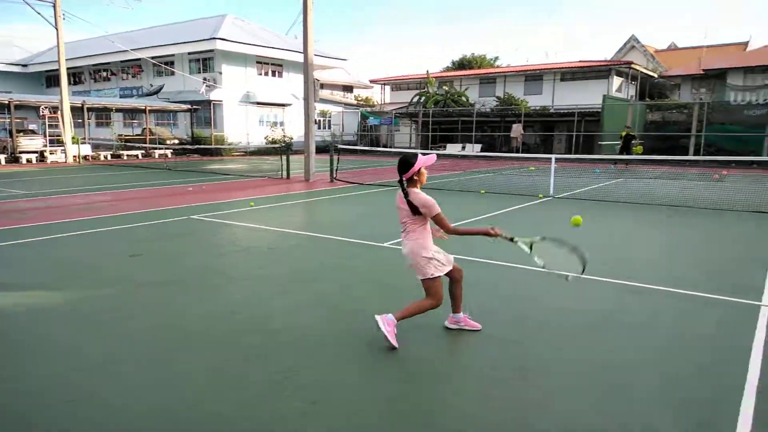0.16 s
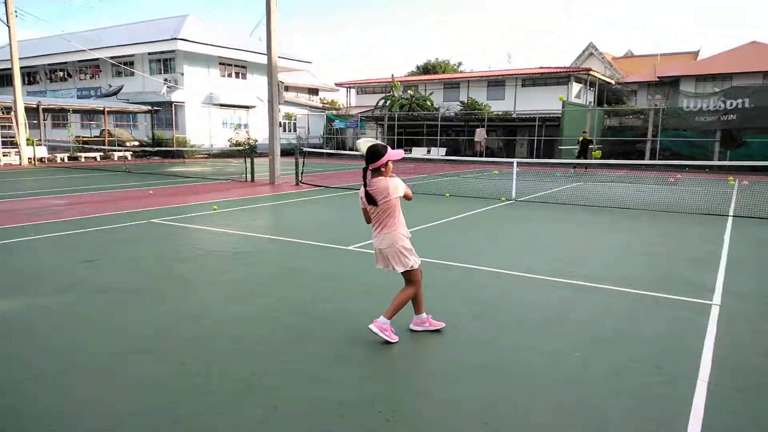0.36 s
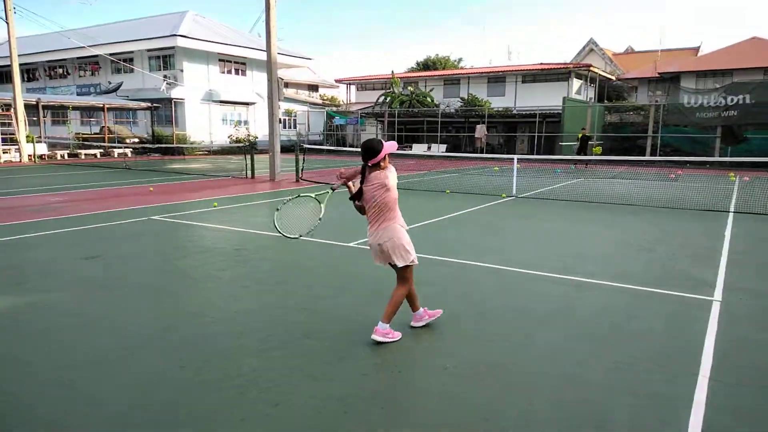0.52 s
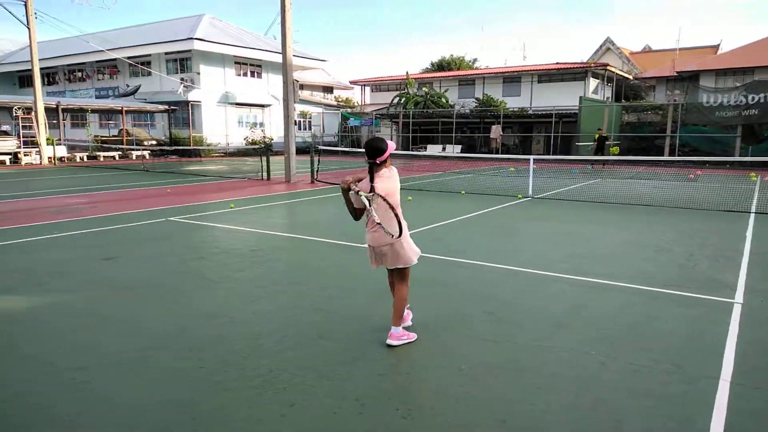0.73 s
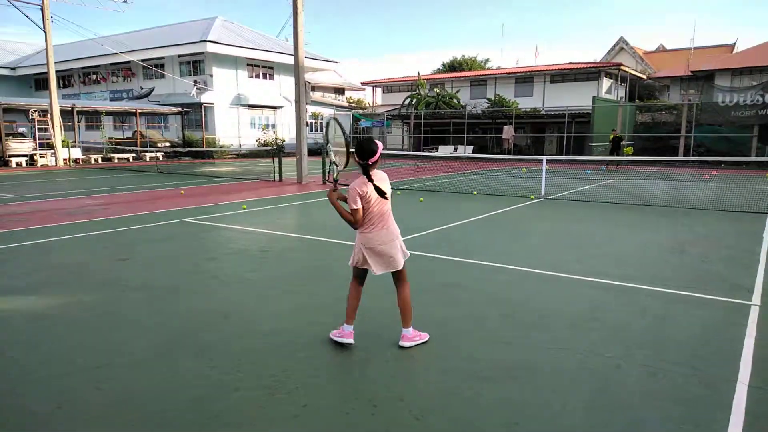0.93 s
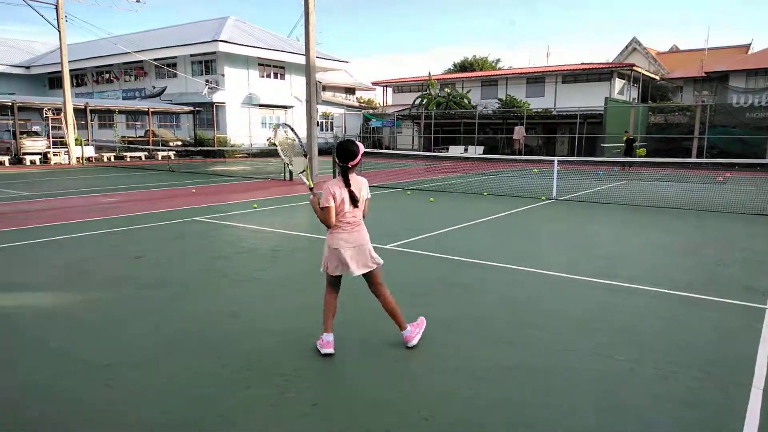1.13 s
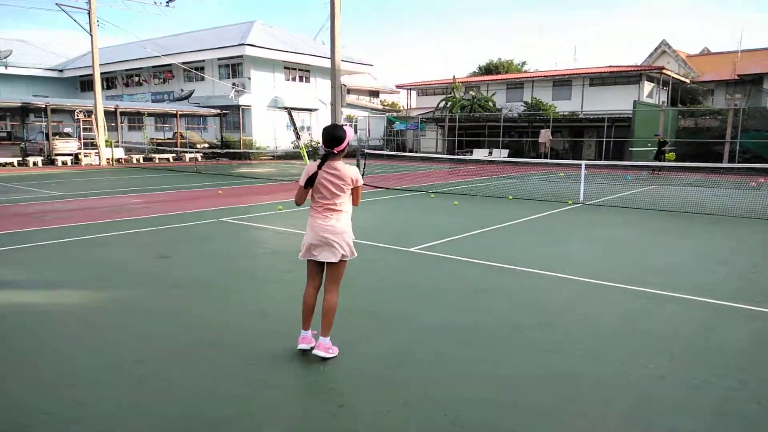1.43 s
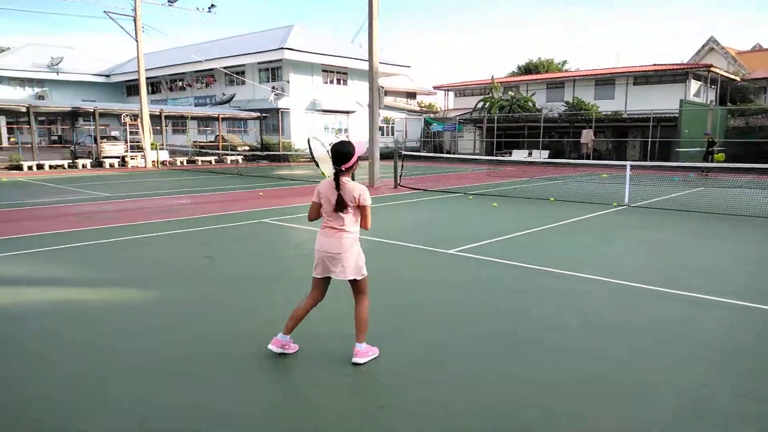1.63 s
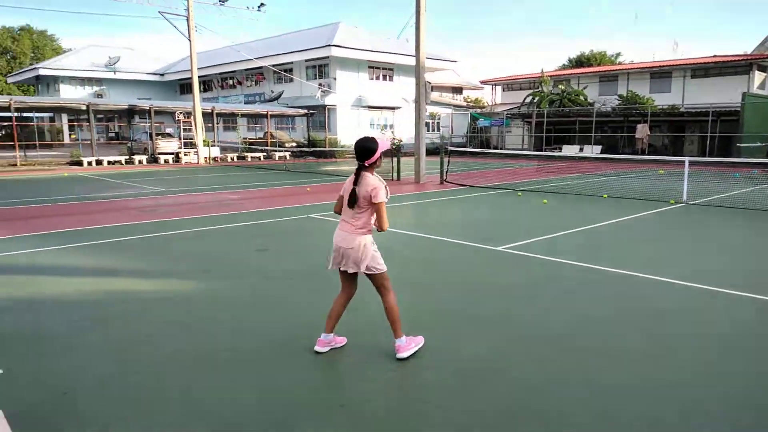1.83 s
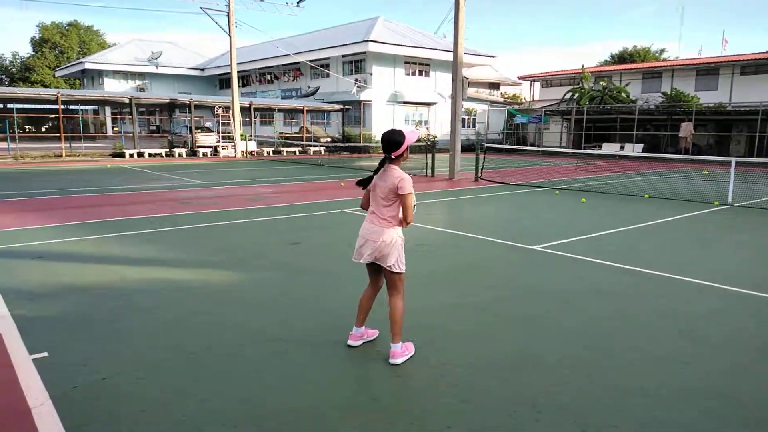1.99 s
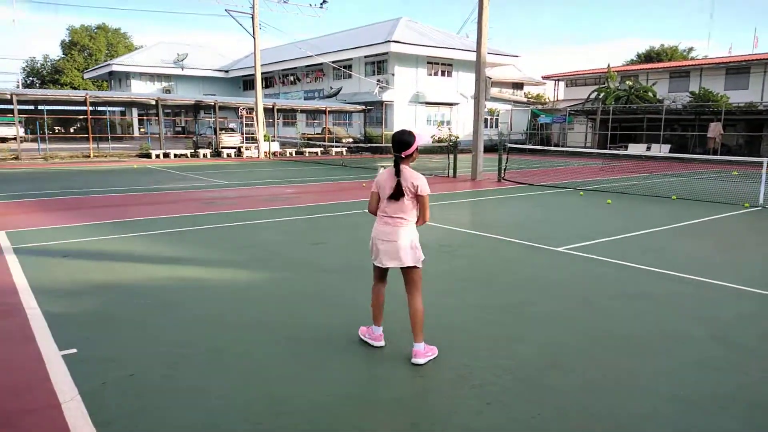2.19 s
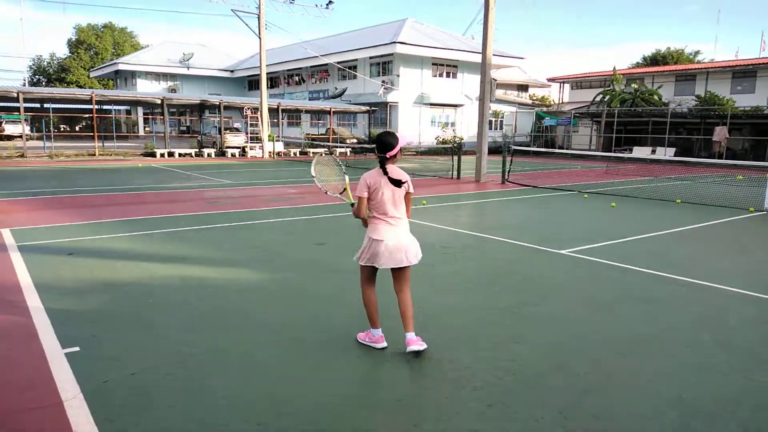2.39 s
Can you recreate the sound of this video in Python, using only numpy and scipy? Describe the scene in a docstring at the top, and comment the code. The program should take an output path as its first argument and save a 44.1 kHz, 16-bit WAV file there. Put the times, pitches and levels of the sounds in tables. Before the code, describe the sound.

Faint gritty shoe scuffs open on an outdoor hard court. At about 0.24 s a racket strikes a tennis ball: a sharp, springy pop with short echoes and a fading wash. Small birds chirp faintly near 0.6, 0.9 and 2.3-2.5 s. A hollow ball knock lands at 1.6 s, with much fainter ones at 1.4, 2.0, 2.1 and 2.3 s. Light steps scuff over quiet distant traffic rumble and low hum.

```python
"""A racket strikes a tennis ball outdoors on a hard court: tuned strings and frame, plus shaped noise.
Buildings and fences return it as separate echoes, clusters of ringing and a fading wash of noise.
Other balls pock later, each a pair of climbing tones over a thud and a crack.
Shoes scuff the court (gritty noise), small birds chirp (blurred gliding tones),
far traffic rumbles (shaped noise) and far machinery hums (a wavering tone)."""
import sys
import numpy as np
from scipy import signal
from scipy.fft import rfft, irfft
from scipy.io import wavfile
from scipy.ndimage import uniform_filter1d

SR = 44100
rng = np.random.default_rng(int(sys.argv[2]) if len(sys.argv) > 2 else 0)


def wrap_up_sound(samples):
    """Save the sound to the file named by the first command line argument, as 16-bit audio."""
    columns = np.atleast_2d(samples).T
    # keep every value between -1 and 1, then stretch to whole-number steps
    tamed = np.clip(columns, -1, 1)
    steps = np.round(tamed * 32767).astype(np.int16)
    wavfile.write(sys.argv[1], SR, steps)


N = 112454  # length in samples

# Colour of the open air and far traffic: pitch_hz, level_db (per Hz)
AIR_COLOUR = [(12, -35), (25, -8.5), (33, -5), (41, -1), (52, 0.5), (65, -6), (107, -7.5), (177, -6.5),
              (248, -19), (328, -17.5), (485, -21), (873, -22), (1440, -26), (1910, -30), (5230, -39),
              (6600, -35.5), (9140, -41), (14000, -38.5), (15600, -37.5), (16000, -32)]
# Shoe scuffs: peak_s, rise_s, fall_s, level_db, tilt_db (per octave)
SCUFFS = [(0.013, 0.042, 0.063, -55, 13.5), (0.052, 0.04, 0.013, -58.5, -2.5), (.115, 0.04, 0.057, -61, -3),
          (0.189, 0.23, 0.11, -64, 9.5), (.45, 0.04, 0.011, -66.5, -1), (0.6, 0.16, 0.063, -68, -4),
          (1.087, 0.037, 0.01, -60, 1.5), (1.119, 0.023, 0.027, -69.5, 1.5),
          (1.219, 0.012, .005, -54.5, 17.5), (1.34, 0.022, 0.023, -72, 0), (1.455, 0.018, 0.013, -65, 3.5),
          (1.57, 0.017, 0.027, -70, 9), (1.65, 0.013, 0.01, -66.5, 4), (1.695, 0.026, 0.012, -64, 0.5),
          (1.89, 0.018, 0.013, -71, 29), (2.023, 0.022, 0.01, -61.5, 0.5),
          (2.488, 0.019, 0.0043, -63, -6.5)]
# Colour of grit under a sole: pitch_hz, level_db (per Hz)
GRIT_COLOUR = [(470, -11), (800, -6.5), (1800, -5), (4860, -12), (6200, -9), (6900, -3), (7700, -13.5),
               (9220, -20), (13000, -25.5), (15500, -12), (16000, -18)]
# Frame and ball tones, beside the strings: pitch_hz, level_db, delay_s, t60_s (time to fall 60 dB)
FRAME_MODES = [(183, -1.5, 0.0024, 0.026), (503, -1, 0.0034, 0.0077), (1005, -16.5, 0.00077, 0.072),
               (1274, -17.5, 0.00045, 0.06), (1600, -11, 0.0045, 0.027), (1740, -9.5, .004, 0.029),
               (2264, -24.5, 0.00109, 0.12), (2714, -17.5, 0.00197, 0.03), (3170, -21, 0.00176, 0.056)]
# Colour of the racket's crack: pitch_hz, level_db (per Hz)
STRIKE_CRACK_COLOUR = [(880, 1.5), (1400, -10.5), (1750, -9), (2100, -8.5), (3500, -11.5), (5600, -14.5),
                       (6500, -10.5), (7000, -4), (7700, -10), (9750, -23), (12400, -20.5), (15500, -24),
                       (16000, -13.5)]
# Echoes of the whole strike: delay_s, level_db
STRIKE_ECHOES = [(.0186, -17), (.05, -29), (.062, -31), (.224, -30)]
# Returns of the struck ball's ring: delay_s, level_db (before the cluster trim in rings)
STRIKE_RING_ECHOES = [(.024, -20), (.04, -24), (.056, -25), (.075, -25), (.095, -28), (.12, -30),
                      (.145, -31), (.18, -33), (.2245, -27), (.262, -30), (.285, -30), (.31, -31),
                      (.335, -32), (.365, -34)]
# Colour of the long tail at its start: pitch_hz, level_db (per Hz)
YARD_COLOUR = [(100, -8), (200, -1), (350, -7.5), (700, -6.5), (830, -2), (900, -6.5), (980, -9),
               (1150, -13), (2000, -19), (4500, -28), (6900, -17), (9500, -37.5), (15500, -23.5)]
# How long the tail lasts at each pitch: pitch_hz, t60_s
YARD_T60 = [(200, 1.83), (900, 1.44), (2500, 1.21), (7000, 0.69), (15000, 0.91)]
# Bird chirps: start_s, length_s, level_db, from_hz, to_hz, width_hz (of each blur filter)
CHIRPS = [(0.547, 0.14, -71.5, 4020, 3680, 999), (0.577, 0.056, -69.5, 3220, 3040, 250),
          (.931, .028, -72, 7200, 6500, 600), (.912, .018, -76, 6000, 5300, 300),
          (.938, .036, -73.5, 6050, 5050, 500), (.955, .075, -74.5, 5700, 5300, 1000),
          (2.282, 0.066, -73, 6100, 6450, 250), (2.342, 0.18, -81.5, 6480, 6350, 150),
          (2.463, 0.038, -77, 4360, 5300, 150), (2.494, 0.0242, -67, 5250, 6600, 100),
          (2.504, 0.035, -73, 6400, 6460, 120)]
# Other balls: start_s, level_db, pitch_hz, upper_ratio, climb_s, swell_s, t60_s,
# thud_db, crack_db (both beside the ring), echo_db, tail_db, early_db (beside the tail)
POCKS = [(1.3941, -46, 1190, 1.51, 0.00097, 0.003, 0.013, -8, -14, -13, -74, 3),
         (1.6051, -28, 965, 1.215, 0.00305, 0.0043, 0.018, -12, -12, -5.5, -55.5, -18),
         (2.015, -48, 702, 1.39, 0.00097, 0.0032, 0.017, -8.5, -16, -17, -80.5, 13),
         (2.073, -54, 744, 1.23, 0.0018, 0.0028, 0.022, -11, -7.5, -24, -96, -4),
         (2.288, -54, 620, 1.36, 0.00087, 0.0014, 0.017, -28, -12, -24, -88, 3)]
# Colour of the other balls' crack: pitch_hz, level_db (per Hz)
POCK_CRACK_COLOUR = [(900, 10.5), (1800, -9.5), (2800, -21.5), (4200, -8), (5300, -18), (6800, -1.5),
                     (8000, -14), (11000, -24), (15500, -17)]
# Echoes of each other whole blow: delay_s, level_db (echo_db is added)
POCK_ECHOES = [(.0115, -13), (.1, -12)]
# Returns of the other balls' ring: delay_s, level_db (echo_db and the cluster trim are added)
POCK_RING_ECHOES = [(.014, -14), (.026, -18), (.043, -9), (.054, -10), (.078, -22), (.095, -22),
                    (.112, -21), (.138, -21), (.165, -23), (.195, -23), (.215, -25), (.25, -25)]

AIR_DB = -59
HUM_HZ, HUM_DB, HUM_WAVER = 40.3, -62.5, 1.3  # waver: size beside the steady part
GRIT_DB = 1.5  # typical size of the random level swings

STRIKE_S, STRIKE_DB = .2368, -21.5
# Strings: slack is the share of pitch missing at first; sink is over one contact time
STRINGS_HZ, SLACK, TIGHTEN_S, SWELL_S, SINK_DB = 751, 0.59, 0.0038, 0.0028, -2
CONTACT_S, LEAVE_S = .0113, .0007
CRACK_DB, CRACK_RISE_S, CRACK_T60 = -8, 0.0038, .03
HIGH_HISS_HZ, HIGH_HISS_DB, HIGH_HISS_T60 = 15300, -18, 0.068

DULL_HZ_S = 350  # treble limit of an echo in Hz = this / delay in s
BALL_HZ, BALL_T60 = 888, 0.026
# Widest extra delay, and widest share of pitch change, inside a cluster of returns
STRIKE_SCATTER_S, STRIKE_DETUNE = .022, .1
POCK_SCATTER_S, POCK_DETUNE = .009, .04
YARD_DB, YARD_START_S = -50, 0.009
EARLY_DB, EARLY_T60, EARLY_TILT_DB = 8, .16, 1  # level beside the tail; tilt about per octave

POCK_SLACK, UPPER_DB = 0.74, -9.5
THUD_HZ, THUD_T60 = 201, 0.074
BODY_HZ, BODY_DB = 513, 3.5  # the flexing wall of the ball; level beside the thud


def amp(db):
    """Turn decibels into a plain multiplier."""
    return 10 ** (np.asarray(db) / 20)


def evened(x):
    """Scale a signal to an rms (average strength) of 1."""
    return x / np.sqrt(np.mean(x ** 2) + 1e-20)


def read(points, hz):
    """Read a curve between its points, along a log pitch scale."""
    f, value = np.transpose(points)
    return np.interp(np.log(hz + 1), np.log(f + 1), value)


def add(mix, s, sound):
    """Add a sound into the mix at time s, cutting what runs past the end."""
    part = mix[round(s * SR):][:len(sound)]
    part += sound[:len(part)]


def hiss(size, colour, tilt_db=0):
    """Noise of rms 1 with a given colour, tilted around 4000 Hz."""
    hz = np.fft.rfftfreq(size, 1 / SR)
    level_db = read(colour, hz) + tilt_db * np.log2((hz + 1) / 4000)
    gain = amp(level_db) * (hz > colour[0][0] / 2)  # nothing far below the first point
    return evened(irfft(rfft(rng.standard_normal(size)) * gain, size))


def burst(t, rise, t60):
    """Loudness shape of a knock: a soft rise, then an exponential decay."""
    t = np.maximum(t, 0)
    swell = np.sin(np.pi / 2 * np.minimum(t / rise, 1)) ** 2
    return swell * amp(-60 * np.maximum(t - rise, 0) / t60)


def climbing(t, hz, slack, tighten):
    """A tone that starts slack, so low, and climbs to its pitch."""
    pitch = hz * (1 - np.clip(slack, 0, 1) * np.exp(-(t / tighten) ** 2))
    return -np.sin(2 * np.pi * np.cumsum(pitch) / SR)


def air():
    """Far traffic and open air: random spectra with faint drifting patches."""
    frames, hz = N // 512 + 5, np.fft.rfftfreq(2048, 1 / SR)
    real, imaginary, patches = rng.standard_normal((frames, 1025, 3)).T
    patches = uniform_filter1d(patches, size=24, axis=0)  # broad in pitch
    patches = evened(uniform_filter1d(patches, size=6, axis=1))  # slow in time; 1 dB rms
    gain = amp(read(AIR_COLOUR, hz)[:, None] + patches) * (hz > 15)[:, None]
    sound = signal.istft((real + 1j * imaginary) * gain, nperseg=2048, noverlap=1536)[1]
    return amp(AIR_DB) * evened(sound[:N])


def hum():
    """Far machinery: a low drone whose strength and phase waver slowly at random."""
    slow = uniform_filter1d(rng.standard_normal((2, N)), size=3000)
    a, b = uniform_filter1d(slow, size=3000)
    waver = 1 + HUM_WAVER * (evened(a) + 1j * evened(b))
    tone = np.exp(2j * np.pi * HUM_HZ * np.arange(N) / SR)
    return amp(HUM_DB) * evened((waver * tone).real)


def shoes():
    """Each short slide of a sole rubs grit: hiss with a fast, uneven level."""
    lead_s = .25  # spare room so early scuffs can begin before the scene
    out, t = np.zeros(N + SR // 2), np.arange(-4096, 4096) / SR
    for s, rise, fall, db, tilt_db in SCUFFS:
        swings = evened(uniform_filter1d(rng.standard_normal(len(t)), size=60))
        grit = amp(GRIT_DB * swings) * hiss(len(t), GRIT_COLOUR, tilt_db)
        slide = np.exp(-(t / np.where(t < 0, rise, fall)) ** 2)
        add(out, s + lead_s, amp(db) * slide * evened(grit))
    return out[round(lead_s * SR) + 4096:][:N]


def racket():
    """Strings tighten round the ball, climb and stop as it leaves; frame, felt and a high hiss add in."""
    t = np.arange(4096) / SR
    swell = np.minimum(t / SWELL_S, 1) ** 2
    held = swell * amp(SINK_DB * np.maximum(t - SWELL_S, 0) / CONTACT_S)
    leaving = np.exp(-np.maximum(t - CONTACT_S, 0) / LEAVE_S)
    strings = held * leaving * climbing(t, STRINGS_HZ, SLACK, TIGHTEN_S)

    frame = np.zeros(len(t))
    for hz, db, late, t60 in FRAME_MODES:
        frame += amp(db) * burst(t - late, 0.0018, t60) * np.sin(2 * np.pi * hz * (t - late))

    # Crack of the felt: a slower burst and a sharper one
    snap = burst(t, CRACK_RISE_S, CRACK_T60) + 1.67 * burst(t, 0.00091, 0.0087)
    crack = amp(CRACK_DB) * snap * hiss(len(t), STRIKE_CRACK_COLOUR)

    # Thin, very high hiss near 15 kHz that fades after the blow
    high_colour = [(0.42 * HIGH_HISS_HZ, -25), (HIGH_HISS_HZ, 0)]
    high_hiss = amp(HIGH_HISS_DB) * burst(t, 0.00073, HIGH_HISS_T60) * hiss(len(t), high_colour)
    return amp(STRIKE_DB) * (strings + frame + crack + high_hiss)


def yard(db, early_db):
    """Fences and walls scatter sound: a quick bright wash, then each pitch dies at its own speed."""
    hz, t, z = signal.stft(evened(hiss(SR, YARD_COLOUR)), SR, nperseg=256)
    tilt_db = EARLY_TILT_DB * np.log2(hz / 1000 + 0.12)[:, None]
    early = amp(early_db + tilt_db - 60 * t / EARLY_T60)
    late = amp(-60 * t / read(YARD_T60, hz)[:, None])
    tail = signal.istft(z * (late + early), SR, nperseg=256)[1]
    # Silent for one start time, then fades in over another
    fade_in = np.clip(np.arange(len(tail)) / SR / YARD_START_S - 1, 0, 1)
    return amp(db) * tail * fade_in


def echoes(x, table, db=0):
    """Walls reflect the blow: each echo is a little smeared, and the far ones lose more treble."""
    out, t = np.zeros(len(x) + SR // 3), np.arange(256) / SR
    for delay, level_db in table:
        smear = rng.standard_normal(len(t)) * np.exp(-t / .0008) * .15 + (t == 0)
        smear = smear / np.linalg.norm(smear)
        r = np.exp(-2 * np.pi * DULL_HZ_S / delay / SR)
        dulled = signal.lfilter([1 - r], [1, -r], x)
        add(out, delay, amp(level_db + db) * np.convolve(dulled, smear))
    return out


def rings(table, db, scatter, detune):
    """Uneven walls return the leaving ball's ring as clusters of five slightly different pitches."""
    out, t = np.zeros(SR // 2), np.arange(4096) / SR
    for delay, level_db in table:
        for k, (late, pitch) in enumerate(rng.random((5, 2))):
            hz = BALL_HZ * (1 + detune * (2 * pitch - 1))
            ring = burst(t, 0.0018, BALL_T60) * np.sin(2 * np.pi * hz * t)
            # The first copy keeps the exact delay; the rest come later and 2 dB weaker
            trim_db = -4 - 2 * (k > 0)
            add(out, delay + scatter * late * (k > 0), amp(db + level_db + trim_db) * ring)
    return out


def birds():
    """Thin gliding whistles, blurred by distance: noise smoothed twice makes each tone unsteady."""
    out = np.zeros(N)
    for s, length, db, from_hz, to_hz, width_hz in CHIRPS:
        u = np.linspace(0, 1, round(length * SR))
        r = np.exp(-np.pi * width_hz / SR)
        real, imaginary = rng.standard_normal((2, 8192))
        blur = real + 1j * imaginary
        for _ in range(2):
            blur = signal.lfilter([1 - r], [1, -r], blur)
        blur = blur[-len(u):]
        glide = np.exp(2j * np.pi * np.cumsum(from_hz + (to_hz - from_hz) * u) / SR)
        tone = ((blur / abs(blur).mean() + 0.25) * glide).real
        add(out, s, amp(db) * np.sin(np.pi * u) * evened(tone))
    return out


def pock(db, hz, upper, climb, swell, t60, thud_db, crack_db):
    """A hollow ball rings in two modes, climbing as it springs back, over a thud and a crack."""
    t = np.arange(4096) / SR
    ring = climbing(t, hz, POCK_SLACK, climb)
    ring += amp(UPPER_DB) * climbing(t, upper * hz, POCK_SLACK, climb)
    thud = amp(thud_db) * burst(t, 0.0013, THUD_T60) * np.sin(2 * np.pi * THUD_HZ * t)
    body = amp(thud_db + BODY_DB) * burst(t, .0025, t60) * np.sin(2 * np.pi * BODY_HZ * t)
    crack = amp(crack_db) * burst(t, 0.0016, 0.037) * hiss(len(t), POCK_CRACK_COLOUR)
    return amp(db) * (burst(t, swell, t60) * ring + thud + body + crack)


def scene():
    """Place every blow with its returns, then add the other sounds."""
    balls, hit = np.zeros(N), racket()
    add(balls, STRIKE_S, hit)
    add(balls, STRIKE_S, echoes(hit, STRIKE_ECHOES))
    add(balls, STRIKE_S, rings(STRIKE_RING_ECHOES, STRIKE_DB, STRIKE_SCATTER_S, STRIKE_DETUNE))
    add(balls, STRIKE_S, yard(YARD_DB, EARLY_DB))
    for s, *ball, echo_db, tail_db, early_db in POCKS:
        hit = pock(*ball)
        ring_db = ball[0] + echo_db  # ball[0] is level_db
        add(balls, s, hit)
        add(balls, s, echoes(hit, POCK_ECHOES, echo_db))
        add(balls, s, rings(POCK_RING_ECHOES, ring_db, POCK_SCATTER_S, POCK_DETUNE))
        add(balls, s, yard(tail_db, early_db))
    return (balls + shoes() + birds() + air() + hum())[None]


def record(dry):
    """Limit the treble with a steep low-pass filter."""
    edge_hz = 15900
    low_pass = signal.firwin(511, edge_hz, window=("kaiser", 9), fs=SR)
    return signal.oaconvolve(dry, low_pass[None], "same")


dry = scene()
out = record(dry)
wrap_up_sound(out)
```